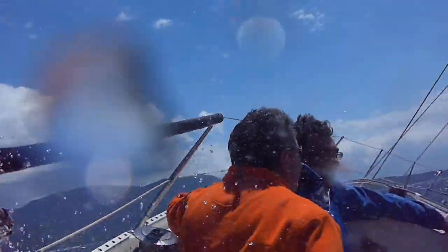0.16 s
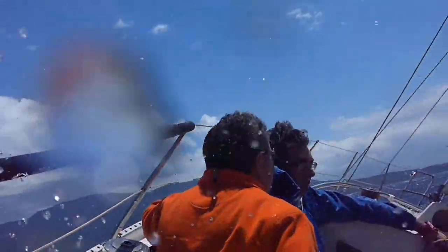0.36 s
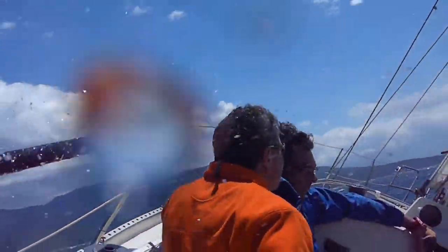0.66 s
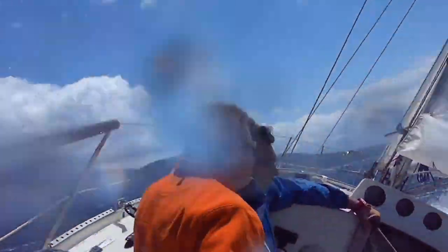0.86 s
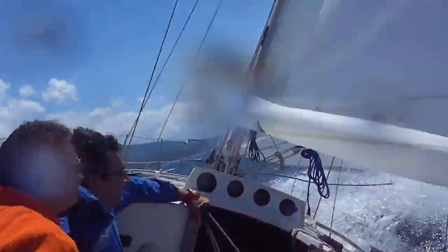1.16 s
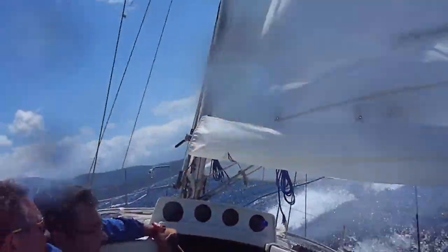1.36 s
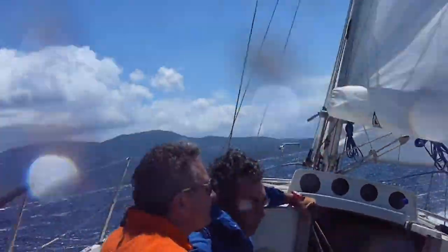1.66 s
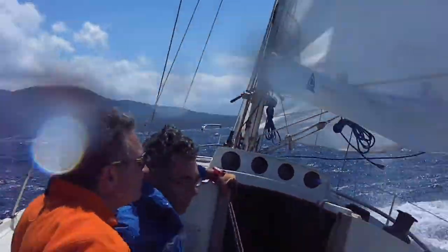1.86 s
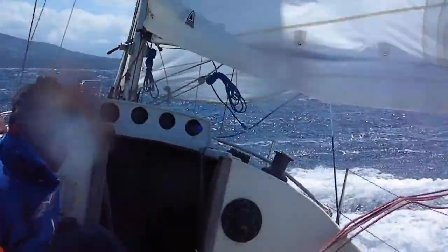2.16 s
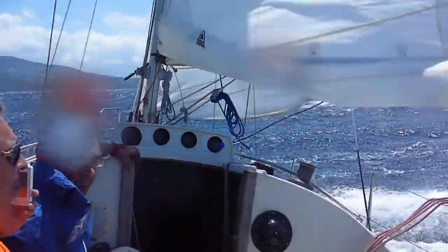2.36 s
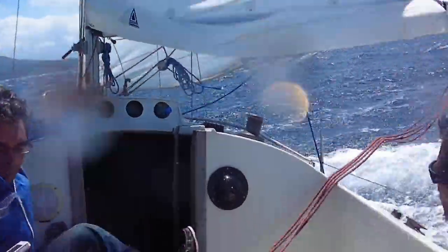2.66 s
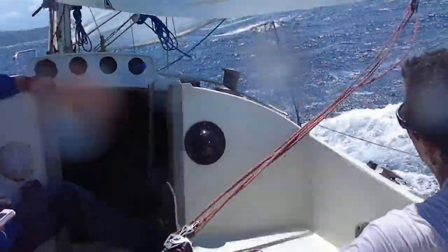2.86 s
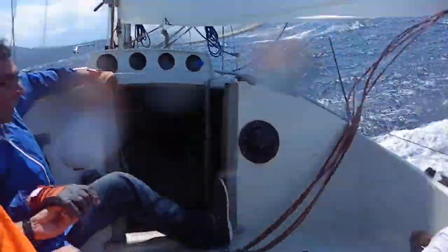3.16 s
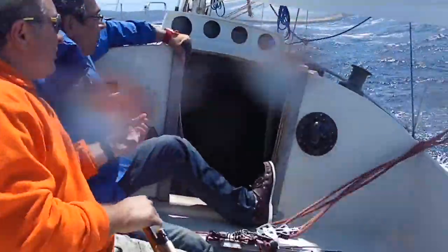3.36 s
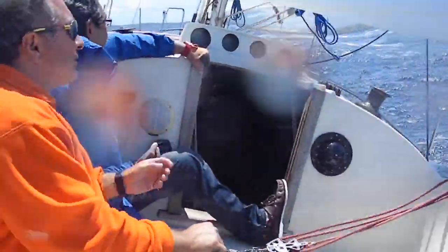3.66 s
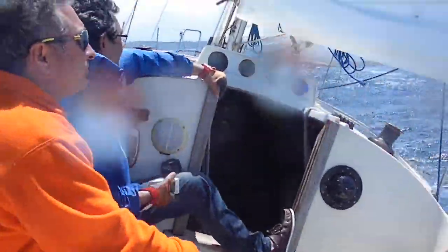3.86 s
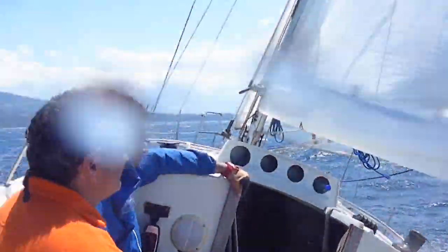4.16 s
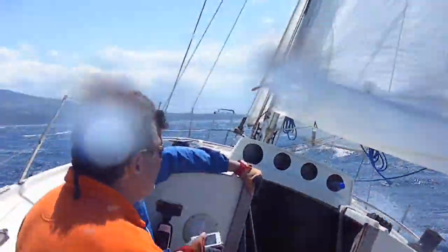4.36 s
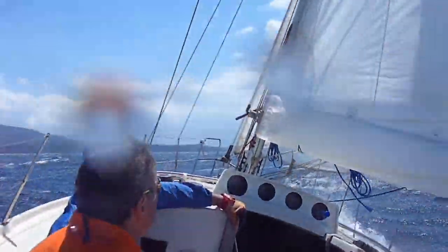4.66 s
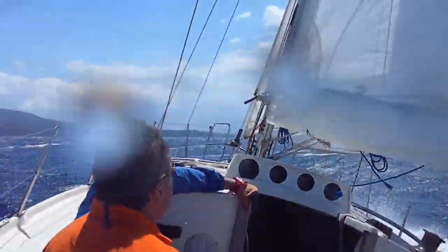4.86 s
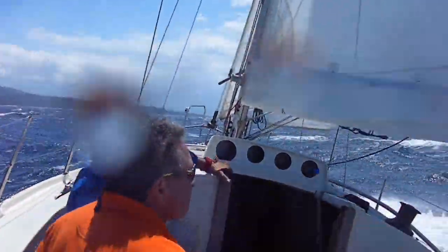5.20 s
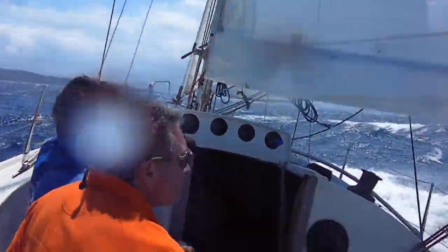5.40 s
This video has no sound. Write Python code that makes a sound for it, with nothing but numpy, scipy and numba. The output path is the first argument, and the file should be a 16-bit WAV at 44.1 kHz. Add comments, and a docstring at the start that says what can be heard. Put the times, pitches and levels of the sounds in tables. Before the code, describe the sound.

In an open sailboat cockpit, a small wet camera microphone is battered at close range, in mono. At 0 s several violent, clipped knocks of water land within 0.03 s, with a burst of wind and foam hiss; the level ducks, and drop ticks and splats follow near 0.15-0.25 s. From 0.4 s muffled, deep wind booms and swells, with thuds around 0.75 and 0.95 s. Sharp cracks hit at 1.13, 1.43 and 1.75 s, among wet splats at 1.3-1.65 s, crackling spray and a bow-wave rush lasting to about 2.25 s. At 1.8 s the wind falls and turns higher, hollow and ringing. It is quietest near 2.5 s; a tiny squeak comes at 2.85 s and another wave rushes faintly. Wind rebuilds by 3.2 s with light knocks and ticks, a very faint thin squeak from 3.75 s, dips at 4.05 s, then gusts with clustered taps at 4.6-4.8 s and more knocks to 5.5 s.

```python
"""Strong wind buffets a small wet camera in the cockpit of a sailboat heeling through a choppy sea.
Turbulence rings a film of water in the microphone port: gusts boom, then the film shifts to a hollow ring.
Water and slaps of air knock on the port, drops tick on the case, blobs splat and fine spray crackles.
Gear squeaks faintly; behind it filtered noise and random impacts make hissing foam and breaking bow waves.
A limiter ducks the whole scene after loud peaks, and the loudest knocks clip flat."""
import sys
import numpy as np
from scipy import signal
from scipy.fft import rfft, irfft
from scipy.io import wavfile
from scipy.ndimage import uniform_filter1d
from numba import njit

SR = 44100
rng = np.random.default_rng(int(sys.argv[2]) if len(sys.argv) > 2 else 0)


def wav_out(sig):
    """Save sig, one row per channel (or a flat mono array), as 16-bit PCM at SR to the path in sys.argv[1]."""
    wavfile.write(sys.argv[1], SR, np.round(np.clip(np.atleast_2d(sig).T, -1, 1) * 32767).astype(np.int16))


N = 244039
TIME = np.arange(N) / SR

# Underlying strength of the wind at the microphone. Each row: time in seconds, level in dB.
WIND_LEVEL = [(0, -15.5), (.33, -36.5), (.39, -25.5), (.62, -23.5), (.85, -21.5), (1.25, -18), (1.68, -17),
              (1.85, -27.5), (2.08, -31.5), (2.47, -33.5), (2.6, -28.5), (2.95, -26.5), (3.2, -22.5),
              (3.55, -23.5), (4.05, -32), (4.35, -25), (4.95, -23), (5.53, -21.5)]
# Gusts and lulls on top of it. Each row: start in seconds, length in seconds, gain in dB.
GUSTS = [(0.043, 0.086, -15), (0.196, 0.034, 7.5), (0.456, 0.23, 1.5), (0.603, .045, -10),
         (0.637, 0.086, 7.5), (0.757, 0.069, -1.5), (1.09, 0.018, 4), (1.31, 0.079, 2), (1.448, 0.03, -9.5),
         (1.713, 0.09, 4.5), (1.793, 0.021, -10), (2.125, 0.017, 9), (3.149, 0.12, 2.5), (3.762, 0.082, 5),
         (4.662, 0.031, 6), (4.873, 0.065, 6)]
GUST_RISE_S, GUST_FALL_S, BUFFET_DB, BUFFET_HZ = 0.019, 0.0083, 1.08, 5.3
# Shapes the water film holds until it shifts. Each row: start in seconds, pitch in Hz, damping as 1/Q,
# gain of the added ring (linear), corner in Hz below which pressure leaks away.
FILM_SHAPES = [(0, 378, 0.17, 0.13, 150), (.45, 453, 0.57, 0.7, 24.7), (1.469, 357, 0.28, 0.9, 131.5),
               (1.794, 633, 0.087, 0.41, 47.4), (2.291, 723.6, 0.093, 0.22, 50.2),
               (3.829, 691, 0.086, 0.22, 48.3)]
SHIFT_S, MUFFLE_PER_PITCH = 0.056, 1.046  # time a shift takes; treble corner as a multiple of film pitch
# Colour of the eddies before the port. Each row: frequency in Hz, relative gain in dB.
EDDY_COLOUR = [(10, -34.5), (25, -23), (50, -5), (90, 2.5), (140, 4.5), (250, 0), (450, -10.5), (800, -6),
               (1300, -9), (2500, -25)]
# Big drops and slaps of air on the port. Each row: time in seconds, peak in dB before the limiter,
# time constant of the push in ms.
KNOCKS = [(.0025, 1.5, 0.33), (.005, 12.5, 0.39), (.011, 14.5, 0.44), (0.0252, 9, 0.4), (0.372, -14.5, 1.4),
          (0.532, -8.5, 0.9), (0.662, -12.5, 1.8), (0.745, -3, 1.1), (.964, -4, 1.18), (1.134, 1.5, 0.39),
          (1.1431, 8.5, 0.22), (1.4344, 6, 0.2), (1.545, 2, 0.96), (1.6538, -8.5, 0.13), (1.658, -0.5, .53),
          (1.7556, 5.5, 0.436), (2.199, -14.5, 0.88), (2.3175, -1, 0.37), (2.571, -15, 0.32),
          (2.652, -15, 0.36), (2.717, -14.5, 0.16), (3.06, -12, 0.22), (3.138, -14, 0.14),
          (3.198, -10, 0.17), (3.354, -6, 0.25), (3.481, -3.5, 0.34), (3.6347, -3.5, 0.44),
          (3.722, -16.5, 0.22), (3.826, 2, 0.17), (3.909, -17, 0.25), (3.984, -19, 0.52),
          (4.316, -13, 0.29), (4.41, -16.5, 0.55), (4.529, -8.5, .43), (4.613, -7, 0.56),
          (4.657, -22, 0.29), (4.693, -5.5, 0.1), (4.706, -3.5, 0.92), (4.744, -9.5, 0.45),
          (4.773, -10.5, 0.32), (4.786, -11.5, 0.85), (4.922, -12.5, 0.14), (5.0908, -1, .3),
          (5.202, -8, 0.22), (5.214, -14.5, 0.19), (5.283, -4.5, 0.33), (5.348, -14.5, 0.078),
          (5.451, -8.5, 0.33)]
# Big spray drops on the case. Each row: nominal time in seconds, level in dB before the common lift.
CASE_DROPS = [(0.1362, -19.5), (0.142, -25), (0.1745, -17.5), (.4316, -41), (.591, -38), (0.6706, -31),
              (0.7403, -28), (0.9215, -42), (0.96, -45), (1.1316, -27.5), (1.1414, -14), (1.3584, -33),
              (1.3736, -32), (1.4014, -34), (1.4332, -7.5), (1.5261, -23.5), (1.5853, -26.5), (1.6107, -30),
              (1.7548, -10), (1.8756, -31.5), (1.9415, -28), (2.0446, -40), (2.1925, -36), (2.5473, -31),
              (2.581, -34), (2.7342, -37), (2.8946, -33.5), (3.028, -26.5), (3.0823, -45), (3.1491, -33),
              (3.17, -33), (3.182, -29), (3.2187, -32.5), (3.2937, -39), (3.33, -22.5), (3.3885, -32),
              (3.404, -36), (3.441, -22), (3.488, -32.5), (3.586, -37), (3.634, -37), (3.8245, -23),
              (4.4677, -24.5), (4.6126, -39), (4.8797, -43.5), (5.091, -46), (5.4949, -34)]
# Colour of a drop's tick. Each row: frequency in Hz, relative gain in dB.
TICK_COLOUR = [(200, -32.5), (900, -35.5), (2000, -7), (3200, 3.5), (5400, -1.5), (7500, -8),
               (10500, -10.5), (14000, -18.5), (17000, -16)]
# Ring of the case. Each row: pitch in Hz, level in dB against the tick's peak, 60 dB decay in seconds.
CASE_RING = [(3980, -38, .055), (5950, -35, .05), (9930, -41, .04), (11920, -42, .04)]
# Showers of fine spray over the deck. Each row: start in seconds, length in seconds,
# level in dB before the common trim.
SHOWERS = [(-.1, .5, -54.5), (.64, .1, -59), (.8, .32, -54), (1.17, .24, -58), (1.52, .24, -58.5),
           (3.1, .35, -66)]
SHOWER_RISE_S, SHOWER_FALL_S = 0.02, 0.071
DRIZZLE_DB = -79  # constant fine spray, before the common trim
# Blobs of water that splat on the cockpit. Each row: time in seconds, level in dB, pitch in Hz.
SPLATS = [(.178, -15.5, 2540), (0.224, -17, 2480), (.843, -29, 3020), (0.931, -32, 1290),
          (1.287, -23, 1300), (1.341, -30, 1490), (1.544, -21, 1600), (1.597, -21, 1490),
          (1.643, -20, 1460), (1.651, -13, 1280), (2.129, -33, 1400), (2.146, -39.5, 1800)]
# Thin squeaks of rope and gear. Each row: start in seconds, length in seconds, first pitch in Hz,
# last pitch in Hz, level in dB before the fade and stutter.
SQUEAKS = [(2.849, 0.02, 4800, 4900, -47), (2.868, 0.026, 6500, 7300, -56), (3.75, 0.45, 4320, 4010, -60)]
SQUEAK_RISE, SQUEAK_FADE_DB = 0.16, -21  # build-up as a share of its length; fall by its end
# Swell of the foam along the hull. Each row: time in seconds, level in dB before its flutter.
FOAM_LEVEL = [(0, -37.5), (.4, -65), (.58, -61), (.95, -65), (1.35, -64), (1.75, -57.5), (2.2, -66.5),
              (2.48, -62), (2.7, -64), (3.33, -60.5), (3.7, -62.5), (4.1, -72), (4.6, -61.5), (5.05, -68),
              (5.3, -64.5)]
# Colour of the foam. Each row: frequency in Hz, relative gain in dB.
FOAM_COLOUR = [(100, -1), (900, 0.5), (2000, -0.5), (3300, 2), (5500, -8.5), (7500, -10), (10000, -13),
               (14000, -17.5), (17000, -34)]
# Bow waves breaking. Each row: start in seconds, length in seconds, level in dB before their flutter.
BOW_WAVES = [(-.1, 0.27, -46), (1.433, 0.82, -46), (2.751, 0.62, -55)]
WAVE_RISE_S, WAVE_FALL_S = 0.074, 0.077
# Colour of the bow waves. Each row: frequency in Hz, relative gain in dB.
WAVE_COLOUR = [(200, -20), (600, 13), (1000, 2.5), (1350, 5.5), (2000, -13), (3500, -21), (8000, -65)]
LIMIT_DB, LIMIT_RATIO, LIMIT_ATTACK_S, RECOVER_DB_PER_S = -6.5, 3.54, 0.0022, 35
FULL_SCALE, NOTCH_HZ, EDGE_HZ = .71, 7800, 16300  # clip level (linear); housing notch; top of the band


def amp(db):
    """Decibels to linear gain."""
    return 10 ** (np.asarray(db) / 20)


def follow(rows):
    """Draws a level curve through its points, at every sample."""
    times, levels = np.transpose(rows)
    return np.interp(TIME, times, levels)


def swell(start, length, rise_s, fall_s):
    """An envelope that rises, holds to the end of its length and dies away."""
    t = TIME - start
    return np.clip(t / rise_s, 0, 1) * np.exp(-np.maximum(t - length, 0) / fall_s)


def spectrum(points, size):
    """Gains of a colour curve on the bins of a transform."""
    hz, db = np.transpose(points)
    bins_hz = np.fft.rfftfreq(size, 1 / SR) + 1  # the offset keeps the logarithm finite
    return amp(np.interp(np.log(bins_hz), np.log(hz), db))


def unit(x):
    """Scales to rms 1."""
    return x / np.sqrt(np.mean(x ** 2) + 1e-20)


def colour(x, points):
    """Filters a sound with a colour curve, at rms 1."""
    return unit(irfft(rfft(x) * spectrum(points, N), N))


def flutter(hz):
    """Slow random motion: noise with a soft roll-off around a rate, rms 1."""
    rolloff = np.exp(-(np.fft.rfftfreq(N, 1 / SR) / hz) ** 2)
    return unit(irfft(rfft(rng.standard_normal(N)) * rolloff, N))


def patter(per_s, spread_db):
    """Random impacts of either sign, mostly small and a few large."""
    size = amp(spread_db * np.minimum(rng.exponential(1, N), 3))
    sign = rng.choice([-1, 1], N)
    return size * sign * (rng.random(N) < per_s / SR)


def add(mix, s, sound):
    """Mixes a sound in at a time in seconds."""
    part = mix[max(round(s * SR), 0):][:len(sound)]
    part += sound[:len(part)]


def water_film():
    """The film slips from one shape to the next; the higher its pitch, the more treble it lets in."""
    starts, *columns = np.transpose(FILM_SHAPES)
    shape = np.searchsorted(starts[1:], TIME)
    glide = round(SHIFT_S * SR)
    hz, damping, share, leak_hz = [uniform_filter1d(c[shape], size=glide) for c in columns]
    return hz, damping, share, leak_hz, MUFFLE_PER_PITCH * hz


@njit
def spring(x, step, damping):
    """A mass on a spring pushed by x: a two-pole low-pass with moving pitch."""
    out, place, speed = np.zeros(len(x)), 0., 0.
    for i in range(len(x)):
        speed += step[i] * (x[i] - place - damping[i] * speed)
        place += step[i] * speed
        out[i] = place
    return out


def port(x, hz, damping, share, leak_hz, muffle_hz, loss):
    """The water film rings at its pitch; the port lets the lows leak away and muffles the highs."""
    step = np.full(len(x), 2 * np.pi / SR)
    x = x - spring(x, step * leak_hz, np.full(len(x), 2.))
    x = x + share * spring(x, step * hz, damping)
    for _ in range(2):
        x = spring(x, step * muffle_hz, np.full(len(x), loss))
    return x


def push(length_ms, rebound=0.55):
    """A pressure pulse: the film is pressed in and springs back."""
    u = np.arange(3000) / SR * 1000 / length_ms
    return u * (1 - rebound * u) * np.exp(-u)


def wind_db():
    """Strength of the wind: a moving level, gusts and lulls, and quick random buffeting."""
    gusts = sum(db * swell(s, length, GUST_RISE_S, GUST_FALL_S) for s, length, db in GUSTS)
    return follow(WIND_LEVEL) + gusts + BUFFET_DB * flutter(hz=BUFFET_HZ)


def wind(film, lumps_db=4.5, brighten_db=0.6, pops=0.48, slaps=0.25, open_hz=700):
    """Lumpy turbulence presses on the port, brighter in each lump; the smallest eddies slap it."""
    *resonance, muffle = film
    lumps = np.clip(flutter(hz=77), -2, 2)
    swirl = unit(rng.standard_normal(N) * amp(lumps_db * lumps))
    eddies = colour(swirl + pops * unit(patter(per_s=300, spread_db=6)), EDDY_COLOUR)
    roar = port(eddies, *resonance, muffle_hz=muffle * amp(brighten_db * lumps), loss=0.82)

    small = np.zeros(N)
    for length_ms in (.1, .27):
        small += signal.oaconvolve(patter(per_s=38, spread_db=7), push(length_ms))[:N]
    snap = port(small, *resonance, muffle_hz=1.9 * muffle, loss=2.8)
    openness = (muffle / open_hz) ** 2  # a low-pitched, heavy film shrugs off small eddies
    roar = unit(roar) + slaps * openness * unit(snap)

    strength = np.sqrt(uniform_filter1d(roar ** 2, size=2000) + 1e-12)
    return roar / strength * amp(wind_db())  # levelled, so that the gusts set the loudness


def knocks(film):
    """Each hit pushes the film in and leaves it ringing; it gets through more brightly than the wind."""
    out = np.zeros(N)
    for s, db, length_ms in KNOCKS:
        pulse = push(length_ms)
        *resonance, muffle = [np.full(len(pulse), np.interp(s, TIME, c)) for c in film]
        ring = port(pulse, *resonance, muffle_hz=550 + 0.64 * muffle, loss=1.12)
        add(out, s - .0005, amp(db) * ring / abs(ring).max())  # starts half a millisecond early
    return out


def burst(hz, cycles):
    """A splash of water: a tone that swells and dies within a few cycles."""
    turns = hz * np.arange(600) / SR
    u = turns / cycles * 2
    return u * np.exp(1 - u) * np.sin(2 * np.pi * turns)


def splats():
    """A blob lands and scatters into smaller splashes."""
    out = np.zeros(N)
    for s, db, hz in SPLATS:
        scatter = rng.standard_normal(300)
        scatter *= np.exp(-np.arange(len(scatter)) / SR / 0.00065) / np.sqrt(SR / hz)
        scatter[0] = 1  # the landing itself
        add(out, s, amp(db) * np.convolve(scatter, burst(hz, cycles=0.62)))
    return out


def drop_tick(size=4096):
    """One drop on the case: a minimum-phase click, sharp in front, with the brief ring of the case."""
    log_gain = np.log(spectrum(TICK_COLOUR, size))
    circle = np.concatenate([log_gain, log_gain[-2:0:-1]])
    tick = np.fft.ifft(np.exp(np.conj(signal.hilbert(circle)))).real
    tick = tick / abs(tick).max()
    t = np.arange(size) / SR
    for hz, db, t60 in CASE_RING:
        tick = tick + amp(db - 60 * t / t60) * np.sin(2 * np.pi * hz * t)
    return tick


def spray(drops_db=3, fine_db=-0.9, mist=0.48):
    """Drops tick on the case, which rings briefly; showers of finer spray crackle on the deck."""
    tick = drop_tick()
    hits = np.zeros(N)
    for s, db in CASE_DROPS:
        spatter = rng.standard_normal(200)
        spatter *= 0.21 * np.exp(-np.arange(len(spatter)) / SR / 0.0012)  # the drop bursts after it lands
        spatter[0] = 1
        add(hits, s + 0.001055, amp(db + drops_db) * spatter)

    near = unit(signal.oaconvolve(patter(per_s=110, spread_db=5.5), tick)[:N])
    deck = np.zeros(N)
    for hz in np.geomspace(2700, 5800, 6):
        deck += signal.oaconvolve(patter(per_s=72, spread_db=5), burst(hz, cycles=3.3))[:N]
    fine = unit(near + mist * unit(deck))
    level = amp(DRIZZLE_DB)
    for s, length, db in SHOWERS:
        level = level + amp(db) * swell(s, length, SHOWER_RISE_S, SHOWER_FALL_S)
    return signal.oaconvolve(hits, tick)[:N] + fine * level * amp(fine_db)


def squeak(start, length, first_hz, last_hz, db, waver_hz=95, stutter_db=3.0):
    """Rope or gear rubs: a faint, unsteady tone that glides as it fades."""
    t = np.arange(0, length, 1 / SR)
    hz = np.linspace(first_hz, last_hz, len(t)) + waver_hz * flutter(hz=250)[:len(t)]
    level = amp(db + SQUEAK_FADE_DB * t / length + stutter_db * flutter(hz=40)[:len(t)])
    rise = np.minimum(t / length / SQUEAK_RISE, 1)
    return rise * level * np.sin(2 * np.pi * np.cumsum(hz) / SR)


def foam():
    """Foam fizzes all along the hull: noise and many tiny impacts, swelling and fluttering."""
    bubbles = rng.standard_normal(N) + 0.77 * unit(patter(per_s=620, spread_db=9))
    return colour(bubbles, FOAM_COLOUR) * amp(follow(FOAM_LEVEL) + flutter(hz=9.8))


def bow_waves(flutter_db=7.7):
    """Bow waves break in a rush of splashes: noise and uneven impacts with a rapid flutter."""
    splashes = rng.standard_normal(N) + unit(patter(per_s=530, spread_db=17))
    waves = sum(amp(db) * swell(s, length, WAVE_RISE_S, WAVE_FALL_S) for s, length, db in BOW_WAVES)
    return colour(splashes, WAVE_COLOUR) * waves * amp(flutter_db * flutter(hz=35))


def scene():
    """Wind and knocks through the wet port, with splats, spray, squeaking gear and the sea."""
    film = water_film()
    mix = wind(film) + knocks(film) + splats() + spray() + foam() + bow_waves()
    for row in SQUEAKS:
        add(mix, row[0], squeak(*row))
    return mix[None]


def limiter(x):
    """Peaks over the limit pull the gain down within milliseconds; it recovers at a steady rate."""
    over_db = np.maximum(20 * np.log10(abs(x).max(0) + 1e-9) - LIMIT_DB, 0)
    cut_db = over_db * (1 - 1 / LIMIT_RATIO)
    recovery = RECOVER_DB_PER_S * TIME
    held_db = np.maximum.accumulate(cut_db + recovery) - recovery
    lag = np.exp(-1 / (LIMIT_ATTACK_S * SR))
    return x * amp(-signal.lfilter([1 - lag], [1, -lag], held_db))


def record(dry):
    """The housing notches the treble, the limiter ducks, the loudest peaks clip, then the top is cut."""
    housed = signal.lfilter(*signal.iirnotch(NOTCH_HZ, 4.5, fs=SR), dry)
    clipped = np.clip(limiter(housed), -FULL_SCALE, FULL_SCALE)
    band = signal.firwin(255, EDGE_HZ, window=("kaiser", 8), fs=SR)
    return signal.oaconvolve(clipped, band[None], "same")


dry = scene()
out = record(dry)
wav_out(out)
```